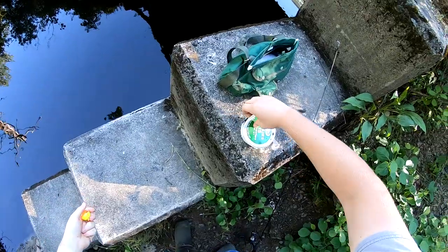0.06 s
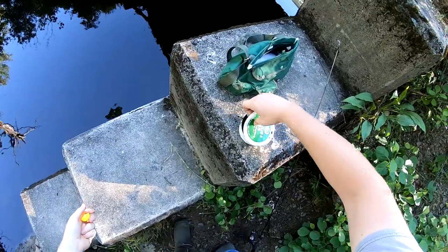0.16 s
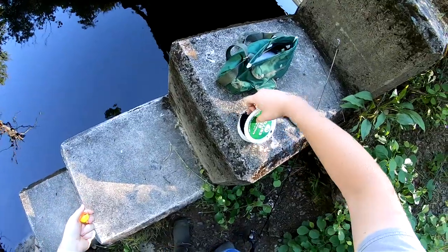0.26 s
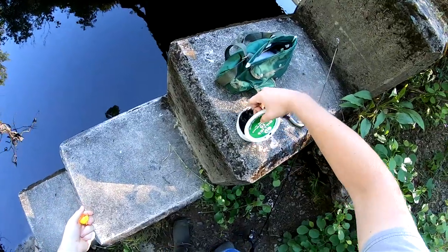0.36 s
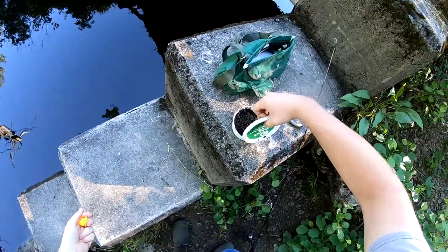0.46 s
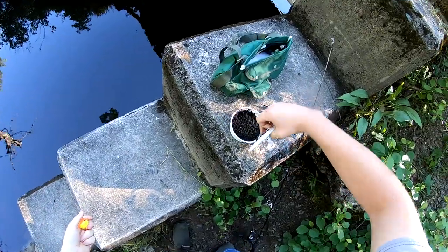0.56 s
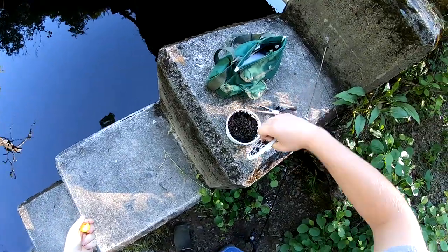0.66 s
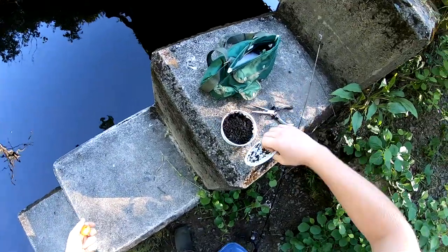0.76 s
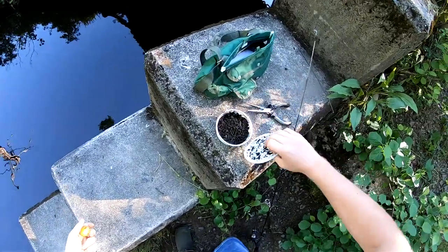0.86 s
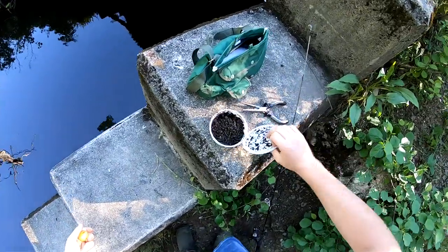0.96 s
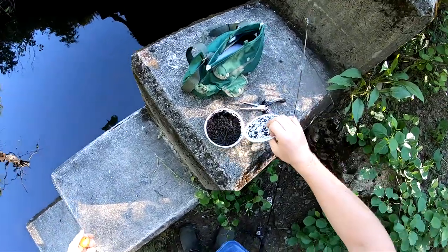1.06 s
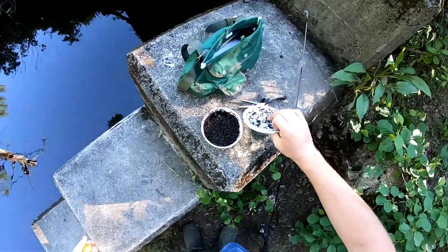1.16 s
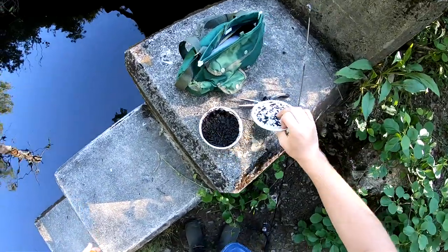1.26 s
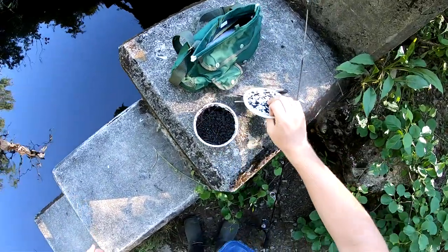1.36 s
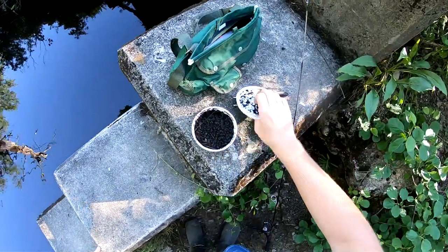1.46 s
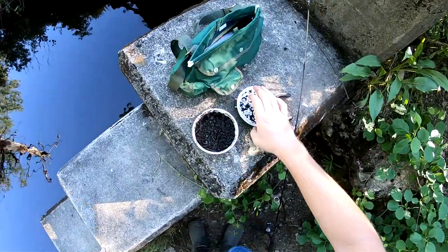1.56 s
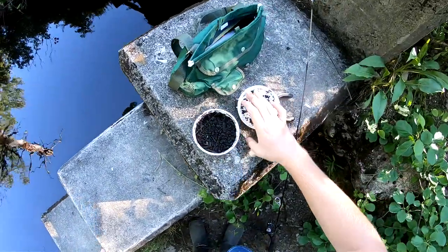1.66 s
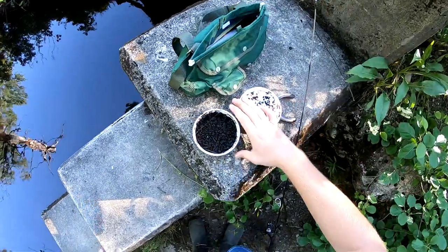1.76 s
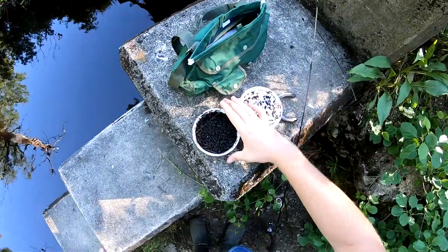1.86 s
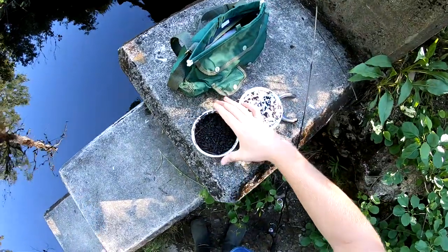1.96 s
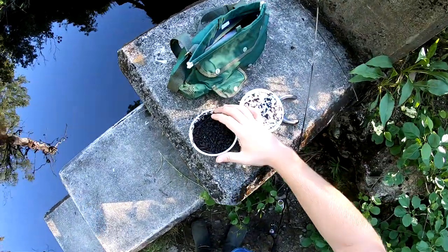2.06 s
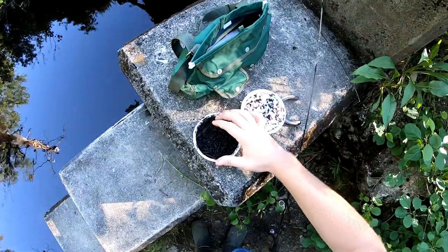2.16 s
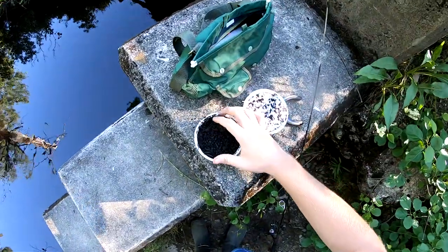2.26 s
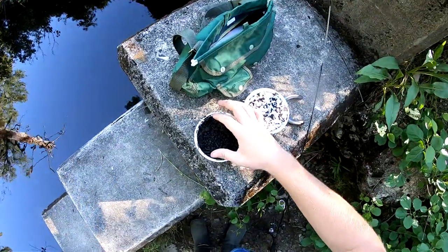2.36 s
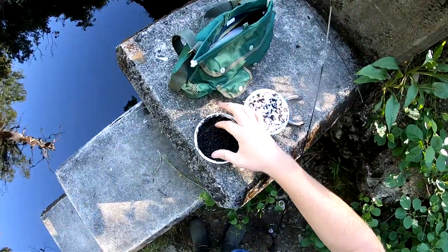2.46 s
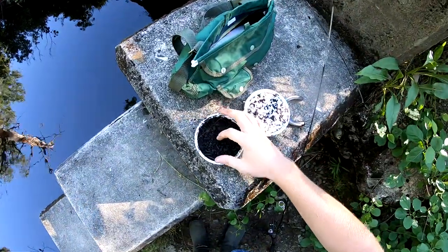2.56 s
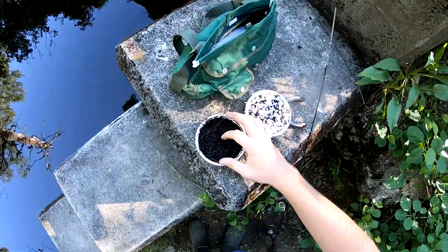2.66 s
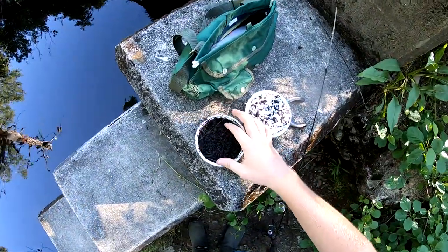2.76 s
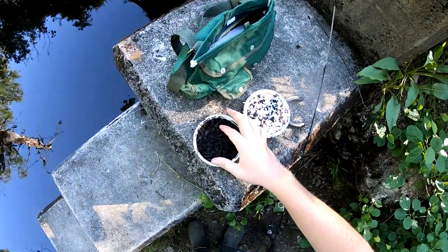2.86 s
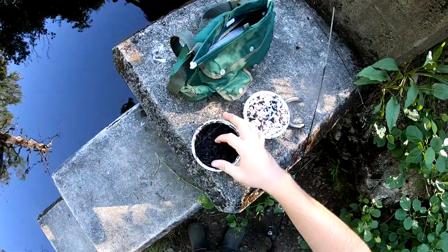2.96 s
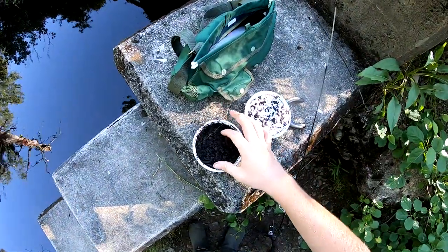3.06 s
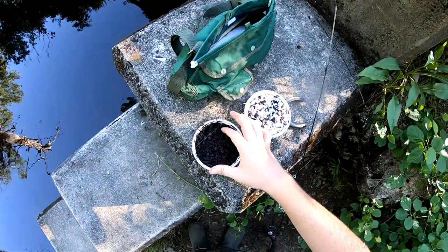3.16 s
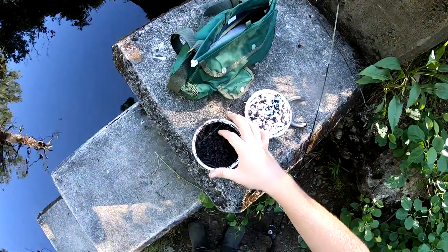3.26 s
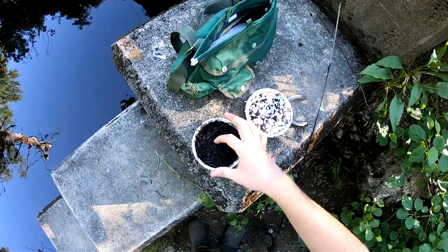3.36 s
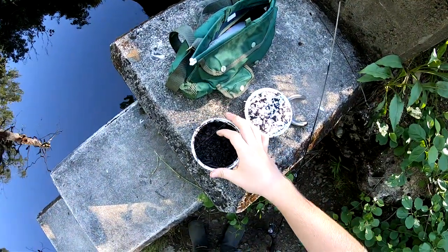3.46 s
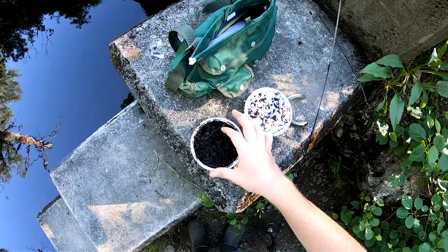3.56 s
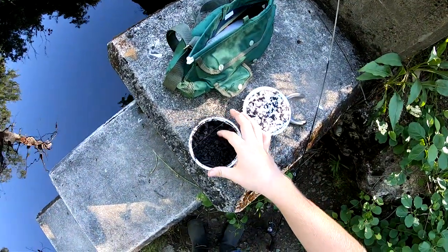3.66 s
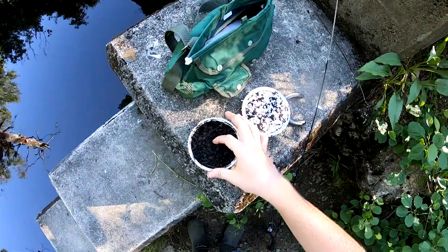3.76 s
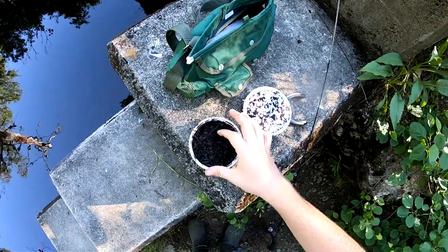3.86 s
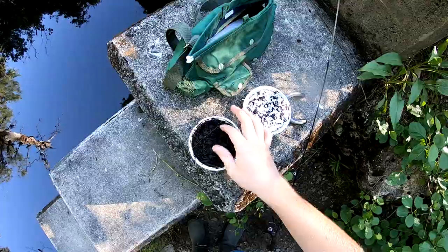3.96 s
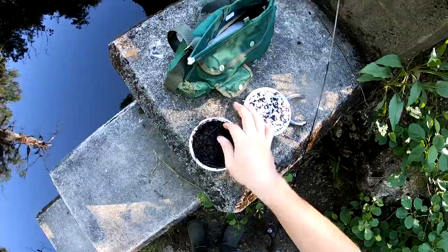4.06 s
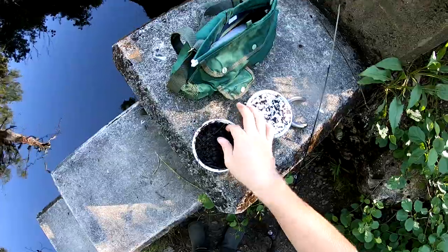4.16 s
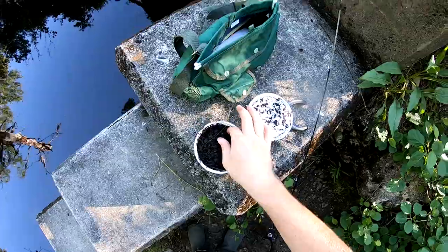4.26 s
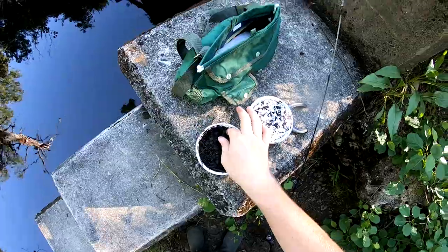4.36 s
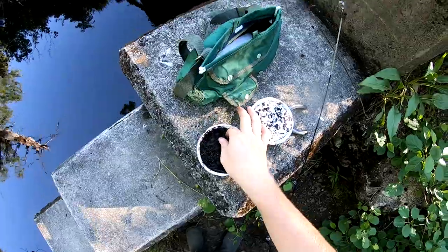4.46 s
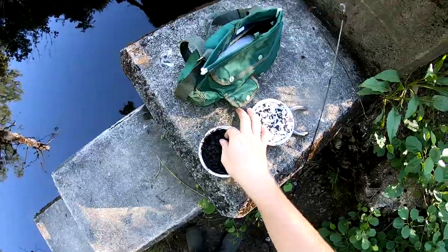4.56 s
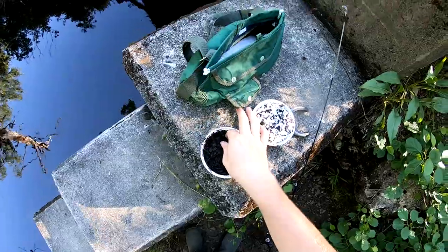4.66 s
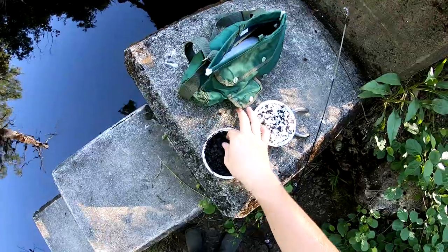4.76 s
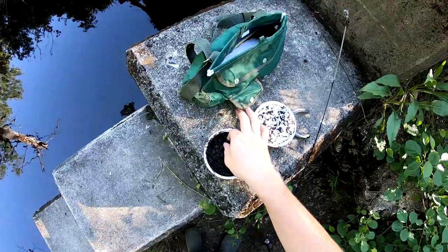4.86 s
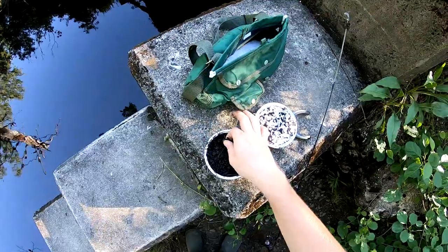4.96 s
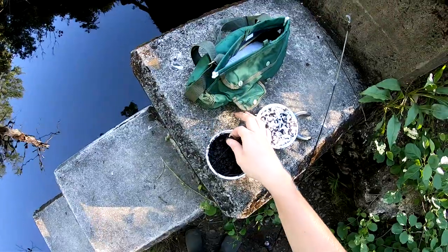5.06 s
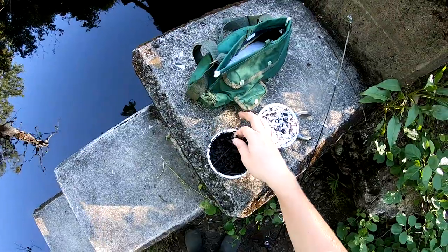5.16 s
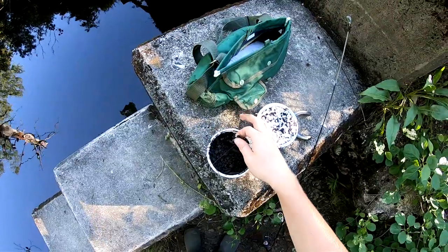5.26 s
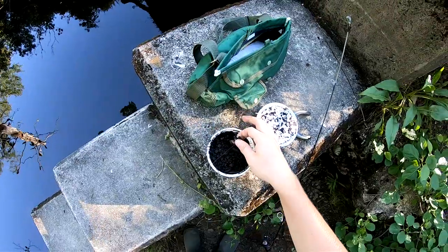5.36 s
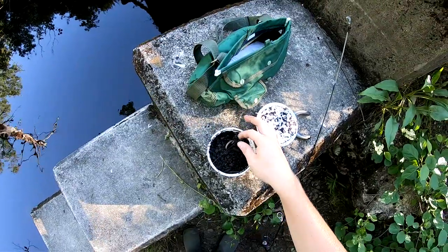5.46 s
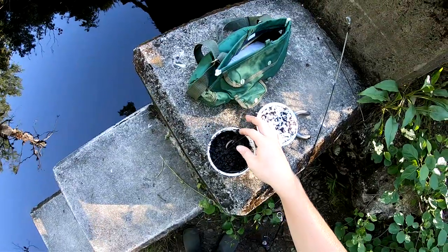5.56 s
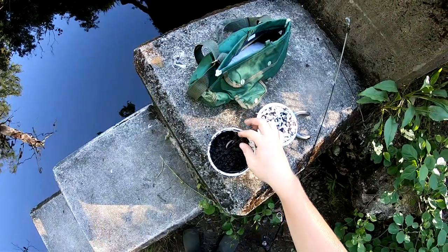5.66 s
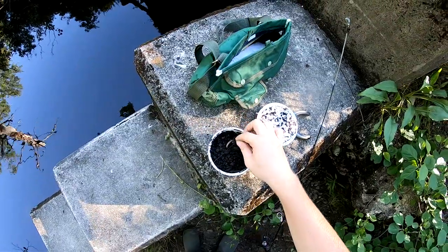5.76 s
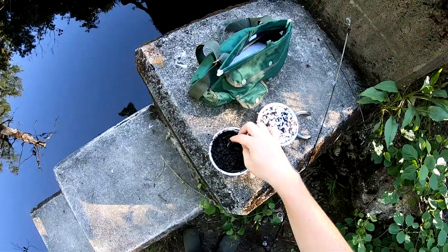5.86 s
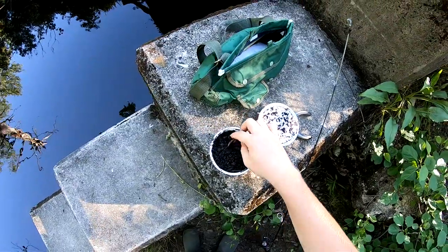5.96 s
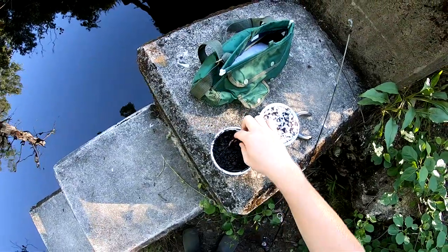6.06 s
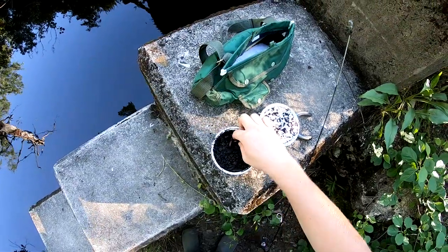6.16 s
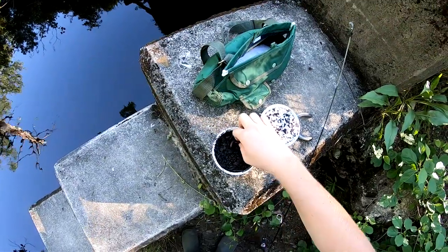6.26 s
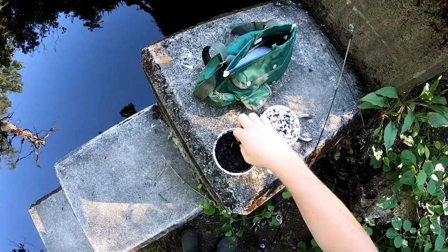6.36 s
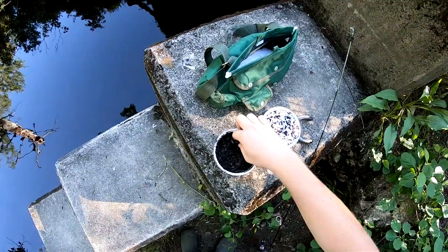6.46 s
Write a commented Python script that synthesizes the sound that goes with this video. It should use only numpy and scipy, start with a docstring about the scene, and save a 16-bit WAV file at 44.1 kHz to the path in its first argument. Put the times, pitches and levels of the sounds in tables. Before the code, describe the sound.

Thin plastic lid creaks, pops and snaps sharply off a tub, clattering on concrete, then faint finger ticks and soil scratches while distant birds sing.

```python
"""Outdoors on a concrete block beside a still creek, a hand flexes and pries the plastic lid off a bait tub.
Lid and tub snap, tick and creak: pulses and noise bursts ring banks of plastic modes.
Cloth swishes near the microphone and fingers pick through soil: coloured, grainy noise shaped by strokes.
Birds sing as gliding, buzzing sine tones trailed by noise echoes among the trees.
A faint, distant rumble of steady wide noise lies behind it all."""
import sys
import numpy as np
from scipy import signal
from scipy.fft import rfft, irfft
from scipy.io import wavfile

SR = 44100
rng = np.random.default_rng(int(sys.argv[2]) if len(sys.argv) > 2 else 0)


def digitize_waveform(pressure):
    """Quantize a signal to 16-bit integers and store it at the path in sys.argv[1].

    Rows of a 2-D input are taken as channels; values are limited to [-1, 1].
    """
    field = np.atleast_2d(pressure).T
    bounded = np.clip(field, -1, 1)
    quanta = np.round(bounded * 32767).astype(np.int16)
    wavfile.write(sys.argv[1], SR, quanta)


N = 287952
TIME = np.arange(N) / SR
HIT_TIME = np.arange(SR // 8) / SR   # time axis of one hit
# Table levels are relative: the trims, stereo balance and filters of the mix follow them.


def from_db(db):
    """Turns decibels into an amplitude factor."""
    return 10 ** (np.asarray(db) / 20)


def rms_one(x):
    """Scales a sound to rms 1."""
    return x / np.sqrt(np.mean(x ** 2) + 1e-30)


def unit_hit(x):
    """Scales a stereo hit to the energy of a hundredth of a second at rms 1."""
    return x / np.sqrt(np.sum(x ** 2) / 2 / (SR / 100) + 1e-30)


def at_hz(points, hz):
    """Reads a curve of (frequency, value) points on a log-frequency axis."""
    point_hz, value = np.transpose(points)
    return np.interp(np.log(hz + 1), np.log(point_hz), value)


def band(x, low_hz, high_hz, order=2):
    """Causal band-pass."""
    low = np.clip(low_hz, 10, .4 * SR)
    high = np.clip(high_hz, 1.05 * low, .45 * SR)
    return signal.sosfilt(signal.butter(order, [low, high], "band", fs=SR, output="sos"), x)


def add(out, s, sound):
    """Mixes a sound in at time s."""
    i = max(0, round(s * SR))
    out[:, i:i + sound.shape[1]] += sound[:, :max(0, N - i)]


def drift(rate):
    """Random values of spread 1, drawn at this rate per second and joined by straight lines."""
    steps = rng.standard_normal(N // 20)
    return np.interp(TIME * rate, np.arange(len(steps)), steps)


def noise(spectrum, likeness, grain_db=0.):
    """Stereo noise of a given colour, broken into grains of uneven strength; rms 1."""
    hz = np.arange(N // 2 + 1) * SR / N
    grains = from_db(grain_db * drift(700))
    mid, side = rfft(rng.standard_normal((2, N)) * grains)
    alike = np.clip(at_hz(likeness, hz), -1, 1)
    both = np.sqrt(1 + alike) * mid + np.sqrt(1 - alike) * side * [[1], [-1]]
    return rms_one(irfft(both * from_db(at_hz(spectrum, hz)), N))


def strokes(rows):
    """One gain over time per level column: strokes rise, hold and fall, and overlaps add in power."""
    power = 0
    for s, rise, hold, fall, *db in rows:
        before = (s - TIME) / max(rise, 1e-3)
        after = (TIME - s - hold) / max(fall, 1e-3)
        # rise and fall are the times for a change of 20 dB
        shape = from_db(-20 * np.clip(np.maximum(before, after), 0, 10))
        power = power + from_db(db)[:, None] ** 2 * shape ** 2
    return np.sqrt(power)


def burst(length_s, side):
    """A cluster of tiny contacts that holds for a moment and then dies, partly different in each ear."""
    mid, apart = rng.standard_normal((2, len(HIT_TIME)))
    return (mid + side * apart * [[1], [-1]]) / (1 + (HIT_TIME / length_s) ** 4) ** .75


def ring(modes, uneven_db, skew):
    """One blow on decaying modes: each has its own strength and differs in phase between the ears."""
    hz, db, t60 = np.transpose(modes)[:, :, None]
    strength = from_db(db + uneven_db * rng.standard_normal(hz.shape)) * rng.choice([-1, 1], hz.shape)
    phase = skew * rng.standard_normal((2,) + hz.shape)
    tone = np.sin(2 * np.pi * hz * HIT_TIME + phase)
    return np.sum(strength * from_db(-60 * HIT_TIME / t60) * tone, axis=1)


RATTLE_S = .0024   # bending waves stay strong in the wall this long


def click(body_modes, ring_hz, octaves, thud_db, crack_db, rattle_db, modes_db):
    """The wall buckles in one pulse, bending waves rattle through it, and its modes ring on."""
    pulse = np.zeros((2, len(HIT_TIME)))
    pulse[:, 0] = 1
    rattle = unit_hit(burst(RATTLE_S, side=0.95))
    modes = unit_hit(ring(body_modes, uneven_db=2, skew=.3))
    wall = unit_hit(pulse) + from_db(rattle_db) * rattle + from_db(modes_db) * modes

    spread = 2 ** (octaves / 2)
    ringing = band(wall, ring_hz / spread, ring_hz * spread)
    body = unit_hit(band(ringing, 520, 4800))

    # the thud builds up just after the pulse
    flex = wall * (1 - np.exp(-HIT_TIME / 0.00064))
    thud = unit_hit(band(flex, 160, 340) + band(flex, 520, 1200))

    # the treble swells for a moment as the fastest waves come back from the rim
    swell = unit_hit(burst(.003, side=.75) * (1 - np.exp(-HIT_TIME / .0015)))
    splinters = swell + 0.45 * wall
    crack = unit_hit(band(splinters, 5000, 8600, order=3) + 0.065 * band(splinters, 7900, 14500))
    return body + from_db(thud_db) * thud + from_db(crack_db) * crack


def scatter(x, t60, low_hz, high_hz, side):
    """Diffuse echoes: dying noise, partly different in each ear, with unit power gain within its band."""
    t = TIME[:SR]
    mid, apart = rng.standard_normal((2, SR))
    echoes = band(mid + side * apart * [[1], [-1]], low_hz, high_hz)
    echoes = echoes * from_db(-60 * t / t60) * (1 - np.exp(-t / 0.0074))
    echoes /= np.sqrt(np.sum(echoes ** 2) / 2 * SR / 2 / (high_hz - low_hz))
    return signal.fftconvolve(x[None], echoes, axes=1)[:, :N]


# modes of the loose lid: frequency [Hz], level_db [dB], t60 [s]
LID_MODES = [(1114, -1.5, 0.043), (1726, 2, 0.02), (3630, 1.5, 0.017), (3690, 0.5, .028), (4060, -2, 0.026),
             (6100, -6, .02), (6845, -1, .03), (7100, -3.5, 0.029)]
# snaps and clatters of the thin lid:
# start_s [s], level_db [dB], ring_hz [Hz], ring_width [octaves], thud_db [dB], crack_db [dB]
LID_SNAPS = [(1.536, -26, 2322, 2.4, -1.5, 1), (1.6364, -29, 2696, 1.1, -14, -5),
             (1.648, -20, 3617, 1.3, -19, -11), (1.6508, -27.5, 2714, 2.6, -20.5, -4),
             (1.6622, -35.5, 2400, 1.8, -13, -6), (1.6703, -35, 1800, 1.6, -20.5, -4.5),
             (1.6784, -25, 3128, 2.0, -14.5, -6.5), (1.6816, -34, 1800, 1.5, -19, -1),
             (1.6885, -32, 3235, 1.9, -12.5, -9), (1.723, -30.5, 2940, 2.2, -14, -3.5),
             (1.7504, -33, 2680, 3.15, -10.5, -7.5), (1.8098, -32.5, 1545, 1.43, -25, -8.5)]


def lid():
    """The thin lid snaps free and clatters on the concrete, each contact a bright click on its modes."""
    out = np.zeros((2, N))
    for s, db, hz, octaves, thud_db, crack_db in LID_SNAPS:
        snap = click(LID_MODES, hz, octaves, thud_db, crack_db, rattle_db=5.0, modes_db=-5.0)
        add(out, s, from_db(db) * snap)
    return out


# modes of the soil-filled tub: frequency [Hz], level_db [dB], t60 [s]
TUB_MODES = [(836, -4.5, 0.043), (1150, 1.5, .016), (1570, 3, .022), (2494, -2.5, .025), (2894, -3, 0.045),
             (3195, 2, 0.02), (3720, -1, 0.015), (5270, -5.5, 0.0067), (5800, 0, .02)]
# wall pops as the tub is pried, let go or gripped:
# start_s [s], level_db [dB], ring_hz [Hz], ring_width [octaves], thud_db [dB], crack_db [dB]
TUB_POPS = [(0.028, -22.5, 2403, 3.7, -5.5, -9), (0.1564, -35, 2054, 3, -3.5, -12.5),
            (0.551, -31.5, 2730, 1.16, -22, -13.5), (2.0606, -42.5, 2160, 1.64, -5.5, -13),
            (2.2042, -24, 2930, 1.17, -11.5, -11), (2.2613, -38, 2680, 2.4, -12, -21),
            (2.2659, -33, 3180, 1.3, -16, -12.5)]
# light touches on the tub: start_s [s], level_db [dB], ring_hz [Hz], hardness_db (crack level) [dB]
LIGHT_TICKS = [(0.5818, -45.5, 2470, -9), (1.46, -46, 1320, -21), (1.7178, -40.5, 2100, -15),
               (1.824, -39, 1970, -24), (1.835, -40.5, 2020, -13), (1.846, -42.5, 2140, -10),
               (1.8712, -46.5, 1940, -9.5), (1.9584, -45.5, 1720, -22), (1.9925, -48.5, 2605, -13),
               (2.087, -47, 1720, -24), (2.1257, -51.5, 2650, -6.5), (2.2828, -50, 1930, -8),
               (2.295, -45, 2580, -15), (2.346, -54.5, 2310, -14), (2.9804, -53, 2100, -22),
               (3.052, -48.5, 1840, -29), (3.0693, -54, 2160, -20), (3.395, -50.5, 2750, -23),
               (3.468, -50, 1310, -27), (3.874, -50.5, 2390, -27), (3.9037, -54, 2530, -37),
               (4.257, -55.5, 2350, -18), (4.624, -54, 2750, -20), (4.8596, -51.5, 3120, -16),
               (5.0194, -50.5, 2900, -22), (5.2518, -56, 1470, -21), (5.6455, -57.5, 1240, -28),
               (6.478, -62.5, 1300, -27)]


def tub():
    """The handled tub pops as its wall buckles; light finger touches tick on the same modes."""
    out = np.zeros((2, N))
    for s, db, hz, octaves, thud_db, crack_db in TUB_POPS:
        pop = click(TUB_MODES, hz, octaves, thud_db, crack_db, rattle_db=3.5, modes_db=-6.0)
        add(out, s, from_db(db) * pop)
    for s, db, hz, hardness_db in LIGHT_TICKS:
        tick = click(TUB_MODES, hz, octaves=1.4, thud_db=-12.5, crack_db=hardness_db,
                     rattle_db=4.5, modes_db=-9.5)
        add(out, s, from_db(db) * tick)
    return out


# resonances of a slow creak: frequency [Hz], level_db [dB], t60 [s]
CREAK_RESONANCES = [(336, -18.5, 0.04), (429, 1.5, 0.031), (543, -6, 0.025), (690, -4.5, 0.03),
                    (820, -0.5, 0.04), (1060, -0.5, 0.024), (1150, -0.5, 0.025), (1520, -10, 0.015),
                    (2300, -11, 0.014)]
# dull creaks and bumps of handled plastic:
# start_s [s], length_s [s], creak_db [dB], bump_db [dB], crackle_db [dB]
PLASTIC_CREAKS = [(0.001, 0.0056, -33.5, -39, -45), (0.024, 0.0074, -33.5, -51.5, -48),
                  (0.125, 0.053, -44.5, -54, -57.5), (0.171, 0.0058, -31, -40, -47),
                  (0.191, 0.006, -23, -45.5, -40), (0.198, 0.005, -33, -40, -36),
                  (0.23, 0.043, -41, -51, -57), (0.254, 0.0057, -37.5, -49.5, -47),
                  (0.273, 0.0027, -34.5, -47, -50), (0.303, 0.0051, -42.5, -62, -70),
                  (0.316, 0.0081, -40.5, -47.5, -49), (0.522, 0.0057, -49.5, -68, -50),
                  (1.535, 0.014, -36, -48.5, -42)]


def creaks():
    """Plastic gives way in a run of gritty slips that ring it, with a low bump and a fine crackle."""
    out = np.zeros((2, N))
    for s, length, creak_db, bump_db, crackle_db in PLASTIC_CREAKS:
        slips = burst(length, side=0.081)
        resonance = ring(CREAK_RESONANCES, uneven_db=2.0, skew=0.1)
        rung = signal.fftconvolve(slips, resonance, axes=1)[:, :len(HIT_TIME)]
        creak = unit_hit(band(rung, 320, 2500))
        bump = unit_hit(band(burst(0.009, side=0.17), 190, 240))
        grit = burst(length, side=0.47) * from_db(18 * rng.standard_normal(len(HIT_TIME)))
        crackle = unit_hit(band(grit, 2050, 3600) + 0.35 * band(grit, 3200, 6500))
        add(out, s, from_db(creak_db) * creak + from_db(bump_db) * bump + from_db(crackle_db) * crackle)
    return out * from_db([[-1.1], [1.1]])   # leans right


# left-right likeness of close noises: frequency [Hz], likeness [1 = same in both ears]
CLOSE_LIKENESS = [(150, 0.94), (450, 0.74), (1600, 0.79), (3400, 1), (7000, 0.69), (11000, 0.25)]
# strokes of cloth and skin: start_s [s], rise_s [s], hold_s [s], fall_s [s], rustle_db [dB], hiss_db [dB]
CLOTH_RUBS = [(0.003, 0.022, 0.0072, 0.035, -45, -53), (0.22, 0.17, 0.036, 0.19, -48, -59.5),
              (0.53, 0.027, 0.021, 0.071, -54.5, -60), (0.765, 0.11, 0.031, 0.045, -55.5, -51.5),
              (0.84, .03, 0.0061, 0.099, -48, -48), (0.9, 0.08, 0.29, 0.76, -49, -52.5),
              (1.025, .11, 0.11, 0.15, -47, -43.5), (1.304, 0.035, 0.014, 0.085, -41, -40),
              (1.56, 0.5, 0.725, 0.13, -63.5, -69.5), (2.66, 0.11, 0.33, 0.3, -99, -78.5),
              (4.7, .5, 0.34, 0.34, -75.5, -76.5), (5.95, .2, 0.13, 0.77, -89.5, -86)]
# colour of the low rustle: frequency [Hz], level_db [dB per Hz]
RUSTLE_COLOUR = [(60, -27.5), (120, -19.5), (170, -5.5), (300, -6.5), (650, -2), (1100, 0.5), (1900, -2),
                 (3000, -4.5), (4500, -22), (9000, -48)]
# colour of the rubbing hiss: frequency [Hz], level_db [dB per Hz]
HISS_COLOUR = [(600, -23), (1800, -3), (3000, 5), (4500, 0.5), (7000, 1), (8500, -9.5), (10000, -9),
               (11500, -19), (14000, -23.5), (16000, -38)]
# the arm bumps softly in mid swing: start_s [s], rise_s [s], hold_s [s], fall_s [s], level_db [dB]
ARM_BUMP = [(1.092, 0.017, 0.05, 0.011, -36.5)]
# a short, bright scuff: start_s [s], rise_s [s], hold_s [s], fall_s [s], level_db [dB]
BRIGHT_SCUFF = [(1.213, .01, 0.0028, 0.013, -30)]
# colour of the scuff: frequency [Hz], level_db [dB per Hz]
SCUFF_SPECTRUM = [(100, -58), (2000, -8.5), (4300, -11), (7000, -3), (8400, -10.5), (9700, 4),
                  (10800, -16.5), (15000, -28)]


def cloth():
    """Fabric rubs near the microphone as the arms move, with one soft bump and one bright scuff."""
    rustle, hiss = strokes(CLOTH_RUBS)
    out = from_db(-0.5) * rustle * noise(RUSTLE_COLOUR, CLOSE_LIKENESS, grain_db=3.5)
    out += from_db(3.0) * hiss * noise(HISS_COLOUR, CLOSE_LIKENESS, grain_db=2.5)
    bump_colour = [(110, -40.5), (152, -2.5), (210, -22.5), (500, -15.0), (1200, -18.5), (4000, -70.0)]
    out += strokes(ARM_BUMP) * noise(bump_colour, CLOSE_LIKENESS)
    return out + strokes(BRIGHT_SCUFF) * noise(SCUFF_SPECTRUM, CLOSE_LIKENESS)


# fingertips scratch the soil: start_s [s], rise_s [s], hold_s [s], fall_s [s],
# grit_db (gritty hiss) [dB], scrape_db (on the tub) [dB]
SOIL_SCRATCHES = [(2.935, 0.021, 0.0079, 0.015, -60, -61), (2.97, 0.017, 0.071, 0.027, -71, -58),
                  (3.05, 0.046, 0.022, 0.027, -66, -48), (3.355, 0.032, 0.018, 0.012, -58, -65.5),
                  (3.465, 0.083, 0.043, 0.012, -68.5, -62), (3.87, 0.063, 0.017, 0.096, -83, -64.5)]


def soil():
    """Fingertips drag through the soil: bright gritty hiss, and a coarser scrape on the tub."""
    grit, scrape = strokes(SOIL_SCRATCHES)
    grit_colour = [(1500, -37.0), (4000, -9.0), (6500, 1), (9000, -14.0), (14000, -43)]
    scrape_colour = [(300, -37), (900, 6.5), (1800, 7.5), (2900, 7.5), (4200, -2.5), (9000, -51)]
    out = grit * noise(grit_colour, CLOSE_LIKENESS, grain_db=5.5)
    return out + scrape * noise(scrape_colour, CLOSE_LIKENESS, grain_db=8.0)


# finger pokes on the tub wall: in_s [s], out_s [s], level_db [dB]
FINGER_POKES = [(3.057, 3.084, -44), (3.187, 3.22, -45.5), (3.307, 3.333, -49.5), (3.46, 3.4928, -42),
                (3.595, 3.6274, -45), (3.716, 3.7408, -47), (3.805, 3.8216, -49.5)]


def pokes():
    """Each poke of a finger clicks the tub wall in, dull, and lets it spring out, bright."""
    out = np.zeros((2, N))
    for in_s, out_s, db in FINGER_POKES:
        wall_in = click(TUB_MODES, ring_hz=1720, octaves=1.47, thud_db=-15.5, crack_db=-22,
                        rattle_db=5.5, modes_db=-27)
        wall_out = click(TUB_MODES, ring_hz=3440, octaves=1.5, thud_db=-15.5, crack_db=-15,
                         rattle_db=-7.5, modes_db=-12.5)
        add(out, in_s, from_db(db - 4) * wall_in)
        add(out, out_s, from_db(db - 3.1) * wall_out)
    return out


# the hand presses on the tub and into the soil:
# start_s [s], rise_s [s], hold_s [s], fall_s [s], level_db [dB]
HAND_PRESSES = [(1.72, 0.28, 0.61, 0.067, -64.5), (2.66, 0.084, 0.45, 0.32, -72),
                (4.68, 0.14, 0.37, 0.65, -62.5), (5.97, 0.17, 0.2, 0.93, -72)]
# colour of the pressing: frequency [Hz], level_db [dB per Hz]
PRESS_SPECTRUM = [(110, -31.5), (170, -2), (270, 1), (480, -18), (2000, -15.5), (7000, -25), (13000, -55)]


def pressing():
    """The hand's pressure on tub and soil makes a low, uneven rumble."""
    return strokes(HAND_PRESSES) * noise(PRESS_SPECTRUM, CLOSE_LIKENESS, grain_db=3.5)


# stereo width of the hits: frequency [Hz], side_gain_db [dB]
HIT_WIDTH = [(200, -14.5), (900, -2), (1700, 0), (3400, -11), (7000, 1), (11000, 4.5)]


def widen(x):
    """Sets stereo width by frequency: the left-right difference is much reduced in the bass."""
    hz = np.arange(N + 1) * SR / (2 * N)
    side = rfft((x[0] - x[1]) / 2, 2 * N) * from_db(at_hz(HIT_WIDTH, hz))
    return x.mean(0) + irfft(side)[:N] * [[1], [-1]]


BUZZ_HZ = 3600   # pitch at which a bird's buzz share applies as given
FLUTTER_DB, FLUTTER_PER_S = 4, 90   # spread and rate of the random changes in a bird's strength


def whistle(glide_hz, edge_s, buzz_share):
    """A bird's tone follows its glide, flutters, fades at both ends and grows buzzier the higher it goes."""
    t = TIME[:len(glide_hz)]
    buzz, flutter = drift(500)[:len(t)], drift(FLUTTER_PER_S)[:len(t)]
    pitch = glide_hz * (1 + buzz_share * (glide_hz / BUZZ_HZ) ** 2 * buzz)
    fade = np.sin(np.pi / 2 * np.minimum(np.minimum(t, t[-1] - t) / edge_s, 1))
    strength = np.sqrt(2) * fade * rms_one(from_db(FLUTTER_DB * flutter))
    return (strength * np.sin(2 * np.pi * np.cumsum(pitch) / SR))[None]


# one slur, a thin lead-in, a fall and an upturn:
# delay_s [s], length_s [s], from_hz [Hz], to_hz [Hz], level_db [dB]
SLUR_PARTS = [(-.09, .085, 5300, 6300, -14), (0, .054, 5100, 3200, -1.5), (.054, .04, 3200, 4400, -1)]
# repeats of the slur: start_s [s], level_db [dB]
SLUR_SONG = [(3.566, -62.5), (3.81, -60), (4.055, -58), (4.311, -55.5), (4.57, -56), (4.825, -56),
             (5.092, -56)]


def slurring_bird():
    """One slur, made of straight glides, repeats about four times a second."""
    out = np.zeros((1, N))
    for s, db in SLUR_SONG:
        for delay, length, from_hz, to_hz, part_db in SLUR_PARTS:
            glide = np.linspace(from_hz, to_hz, round(length * SR))
            part = whistle(glide, edge_s=0.0074, buzz_share=.047)
            add(out, s + delay, from_db(db + part_db) * part)
    return out[0]


# whistled phrases of other birds: start_s [s], length_s [s], level_db [dB], centre_hz [Hz],
# swing_rate [per s], swing_hz [Hz], starting_lift_hz [Hz], buzz [share of pitch at BUZZ_HZ]
BIRD_PHRASES = [(0.234, 0.11, -60, 3414, 15, 172, 3, 0.07), (0.352, 0.19, -63.5, 3010, 10, 65, 238, 0.093),
                (2.403, 0.041, -70.5, 3710, 8.6, 133.5, 2, 0.02),
                (2.432, 0.16, -70.5, 2840, 10.5, 322, 501, 0.023),
                (3.089, 0.1, -69, 3430, 4.4, 443, -3, 0.085),
                (3.176, 0.074, -59.5, 3186, 9.8, -250, -2, 0.048),
                (3.22, 0.043, -63.5, 2960, 11, 419, -6, 0.028),
                (3.633, 0.067, -65, 2976, 10.4, 305, 494, 0.037),
                (3.833, 0.13, -64.5, 3050, 10.7, 334, 494, 0.036),
                (5.093, 0.15, -61.5, 2947, 12.4, 440, -150, 0.035),
                (5.212, 0.095, -65.5, 2877, 13.5, 119.5, -750, 0.035),
                (5.307, 0.051, -63, 2690, 8.3, 350, 8, 0.025),
                (5.387, 0.082, -62.5, 2916, 17.5, -280, -55, 0.028),
                (5.619, .12, -76, 1590, 6.6, 30, -2, .12), (5.749, .6, -81, 4510, 7.4, 298, -600, .08),
                (6.379, 0.062, -72, 3540, 17.8, -200, -0.5, 0.094),
                (6.43, 0.102, -65.5, 3100, 20, 258, 1102, 0.119)]
LIFT_S = 0.024   # time constant of the starting lift's decay


def warbling_birds():
    """Each phrase starts with its pitch lifted up or down, settles, and swings about its centre."""
    out = np.zeros((1, N))
    for s, length, db, centre_hz, rate, swing_hz, lift_hz, buzz in BIRD_PHRASES:
        t = TIME[:round(length * SR)]
        lift = lift_hz * np.exp(-t / LIFT_S)
        swing = swing_hz * np.cos(2 * np.pi * rate * t)
        add(out, s, from_db(db) * whistle(centre_hz + lift + swing, edge_s=0.0045, buzz_share=buzz))
    return out[0]


BIRD_ECHO_SIDE = 0.65   # how much the echoes differ between the ears


def birds():
    """The songs come from far off, trailed by echoes among the trees; foliage smears the slurring bird."""
    slurs, warble = slurring_bird(), warbling_birds()
    direct = from_db(-3.5) * slurs + from_db(-1.0) * warble
    foliage = from_db(-7.0) * scatter(slurs, 0.15, 1500, 8000, BIRD_ECHO_SIDE)
    echoes = from_db(-0.5) * scatter(slurs + from_db(-1.5) * warble, 0.8, 1200, 8000, BIRD_ECHO_SIDE)
    return direct + foliage + echoes


# colour of the distant outdoor background: frequency [Hz], level_db [dB per Hz]
AIR_COLOUR = [(15, -40), (25, -2.5), (90, -19.5), (167, 3), (301, -7.5), (558, -17), (749, -5),
              (952, -12.5), (2370, -18), (3900, -15.5), (5200, -23), (10000, -33.5), (11200, -53)]
# its left-right likeness: frequency [Hz], likeness [1 = same in both ears]
AIR_WIDTH = [(30, .4), (150, 0.042), (8000, 0.076)]


def open_air():
    """A faint, distant rumble: steady noise that differs widely between the ears."""
    return from_db(-69) * noise(AIR_COLOUR, AIR_WIDTH)


NEAR_PAN_DB = -1.5   # left gain minus right gain for the close sounds


def scene():
    """Lid, tub, cloth and soil are close and a little to the right; birds and open air lie all around."""
    # such small objects radiate almost no bass
    bass_cut = signal.butter(4, 140, "high", fs=SR, output="sos")
    hits = signal.sosfilt(bass_cut, lid() + tub() + creaks())
    # the slab and the bank send back a quick reflection, the trees a faint tail
    slab = from_db(-18.5) * scatter(hits.mean(0), 0.11, 290, 12000, side=0.46)
    trees = from_db(-25.5) * scatter(hits.mean(0), 0.36, 270, 8100, side=0.53)
    near = widen(hits + slab) + cloth() + soil() + pokes() + pressing()
    panned = near * from_db([[NEAR_PAN_DB / 2], [-NEAR_PAN_DB / 2]])
    return panned + trees + birds() + open_air()


def record(dry):
    """The top is cut steeply above 15.5 kHz."""
    return signal.sosfilt(signal.ellip(10, .1, 80, 15500, fs=SR, output="sos"), dry)


dry = scene()
out = record(dry)
digitize_waveform(out)
```